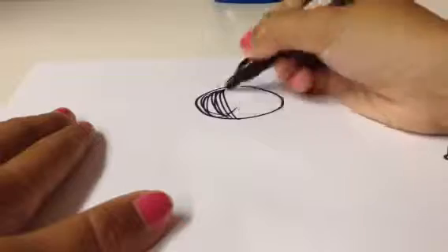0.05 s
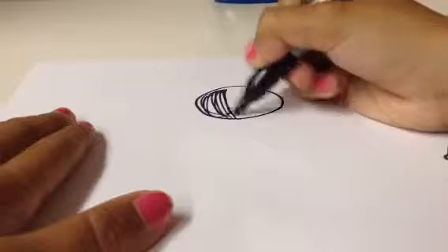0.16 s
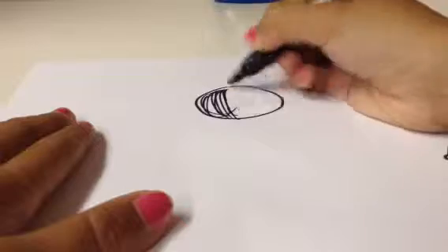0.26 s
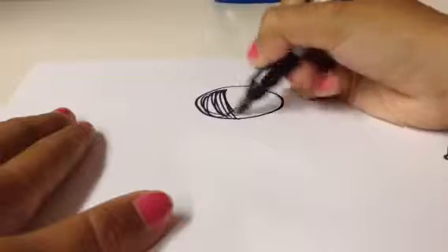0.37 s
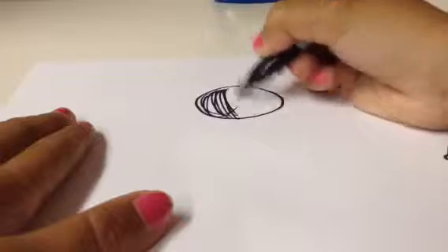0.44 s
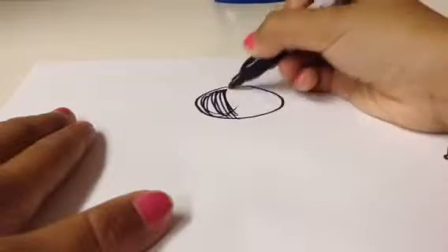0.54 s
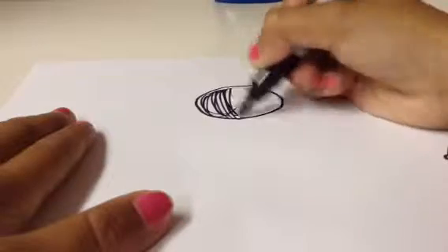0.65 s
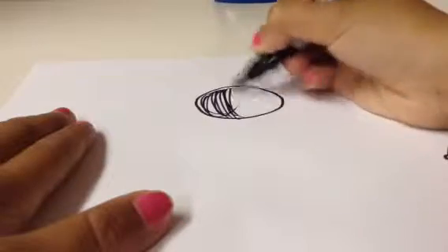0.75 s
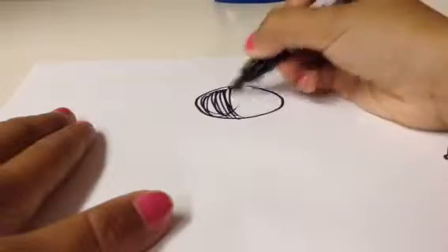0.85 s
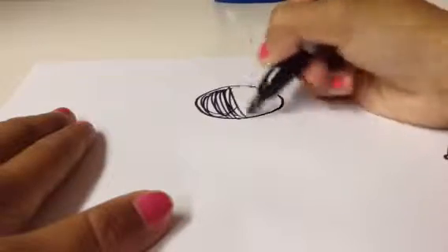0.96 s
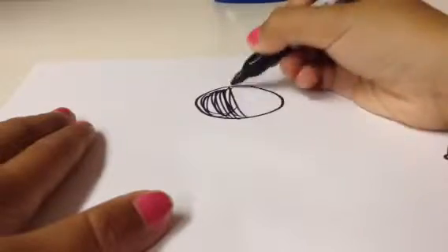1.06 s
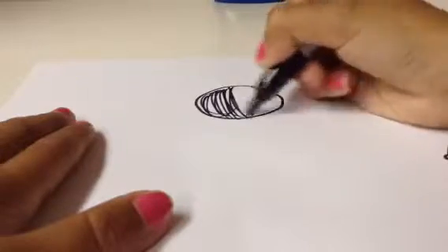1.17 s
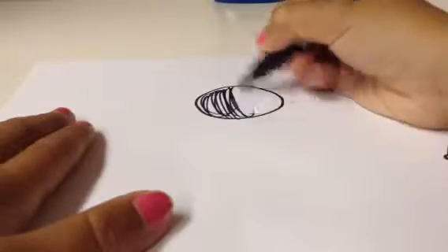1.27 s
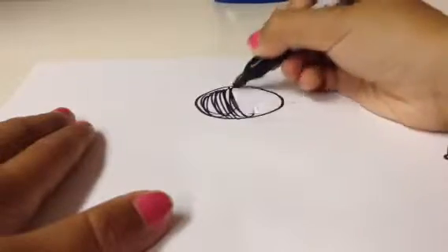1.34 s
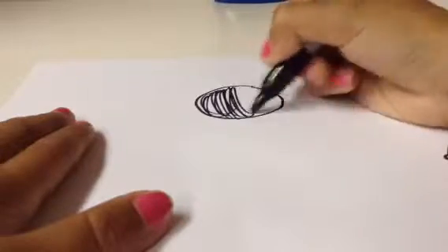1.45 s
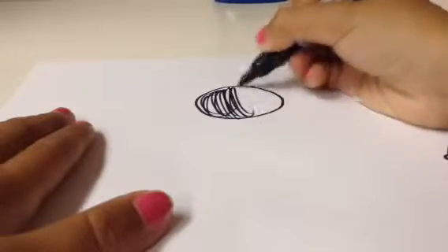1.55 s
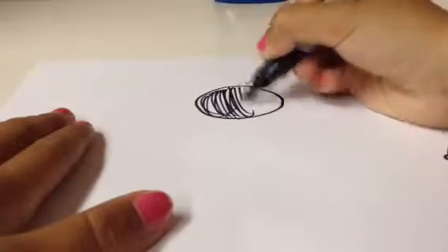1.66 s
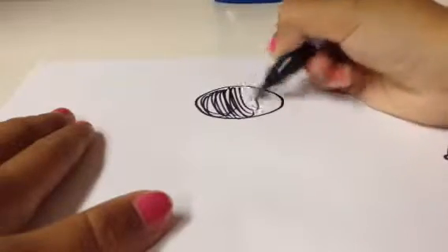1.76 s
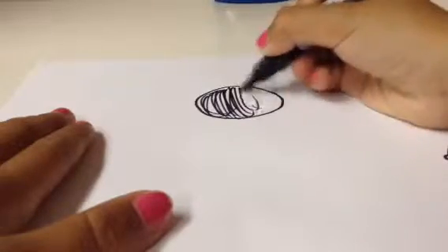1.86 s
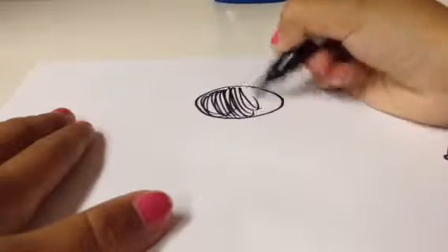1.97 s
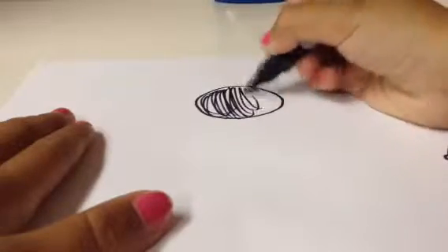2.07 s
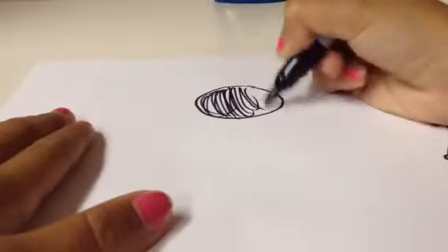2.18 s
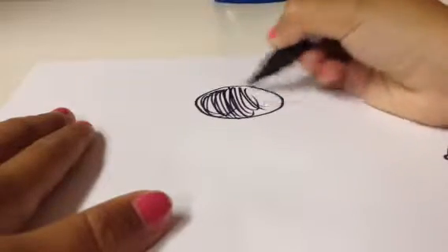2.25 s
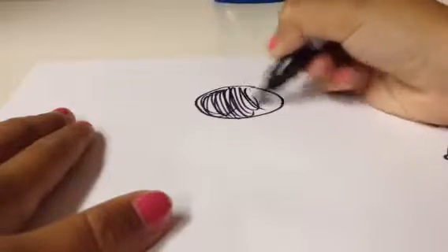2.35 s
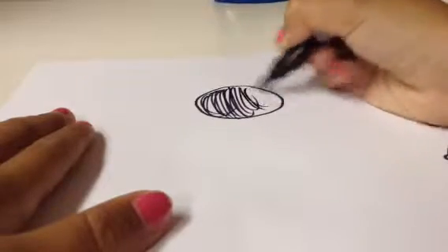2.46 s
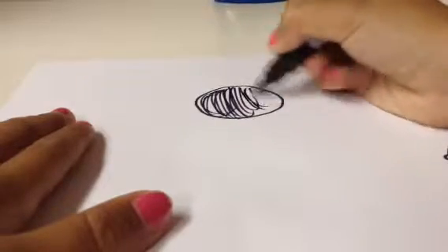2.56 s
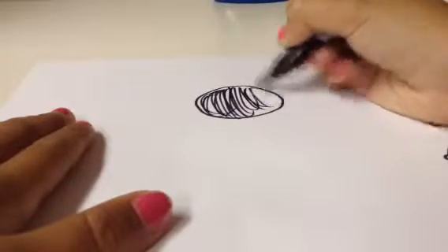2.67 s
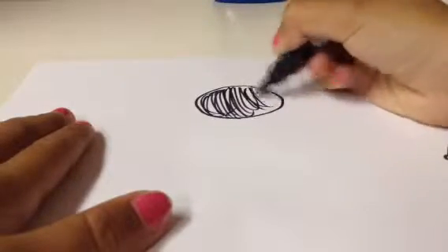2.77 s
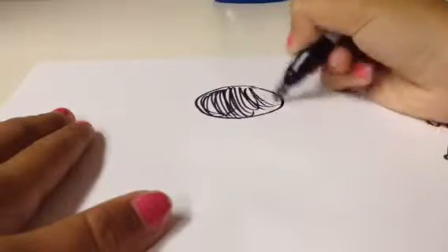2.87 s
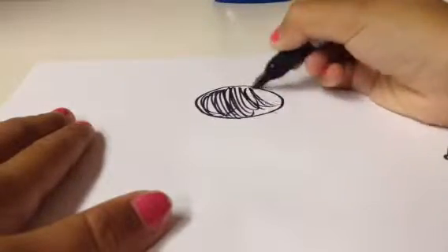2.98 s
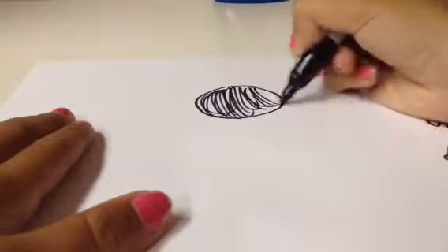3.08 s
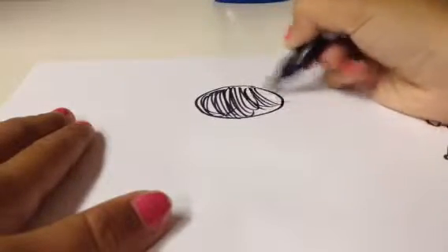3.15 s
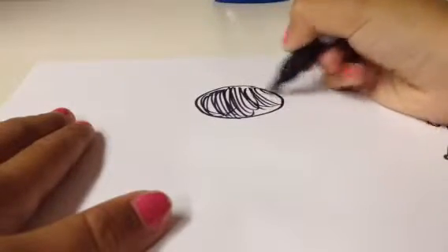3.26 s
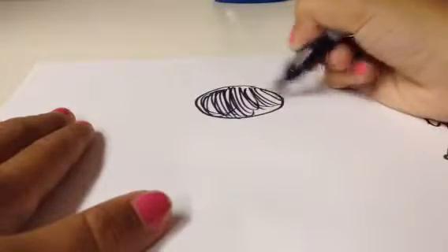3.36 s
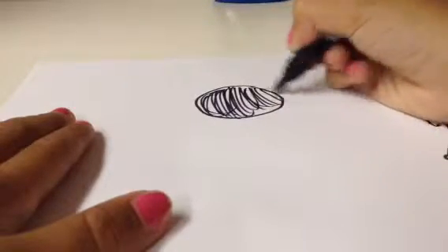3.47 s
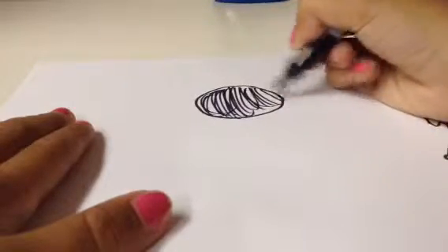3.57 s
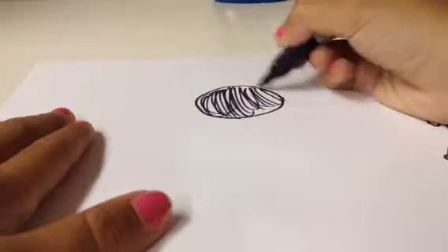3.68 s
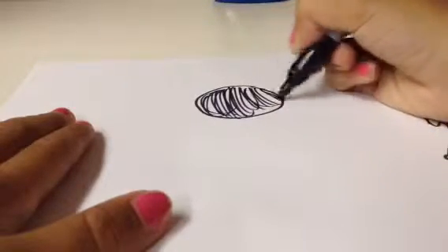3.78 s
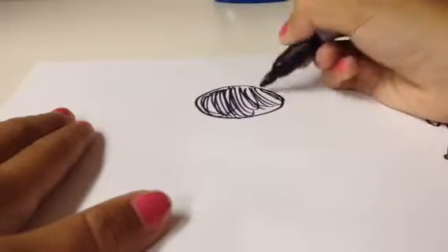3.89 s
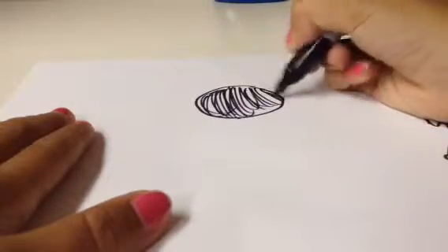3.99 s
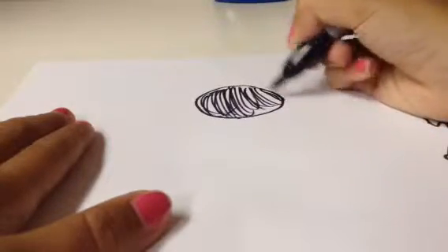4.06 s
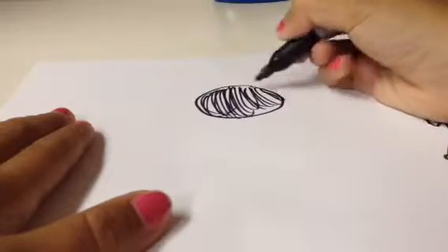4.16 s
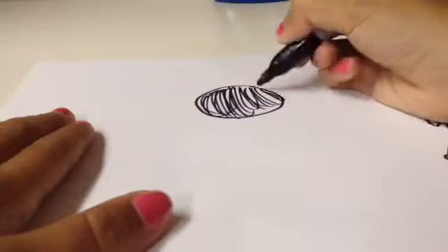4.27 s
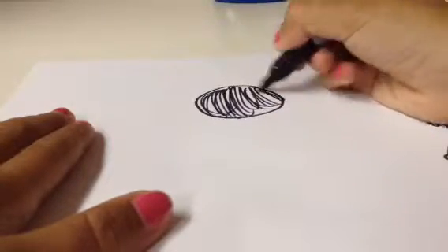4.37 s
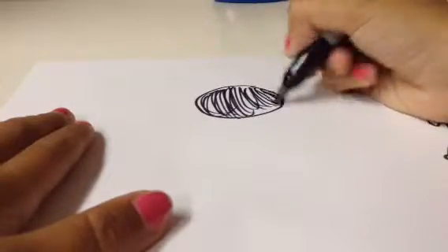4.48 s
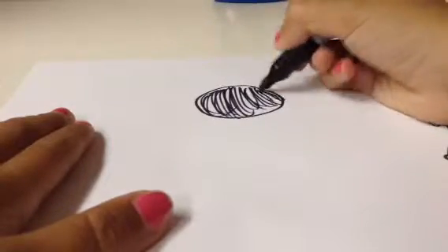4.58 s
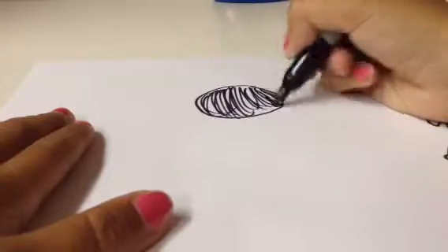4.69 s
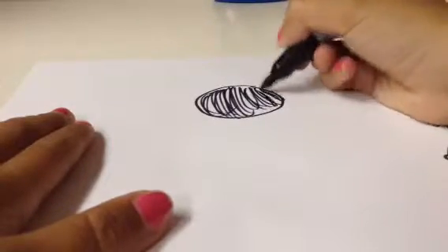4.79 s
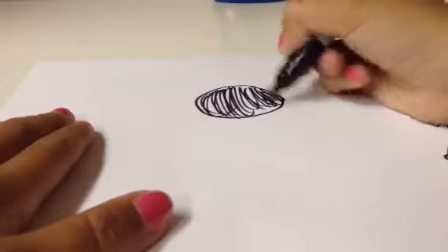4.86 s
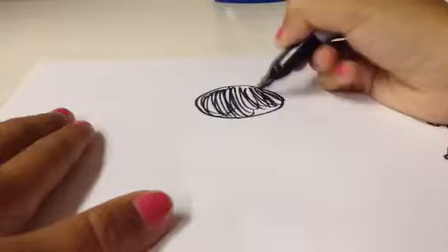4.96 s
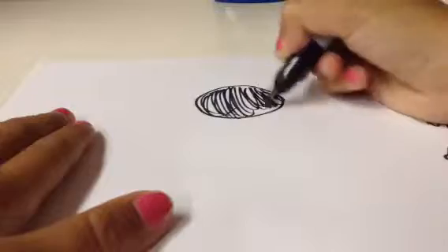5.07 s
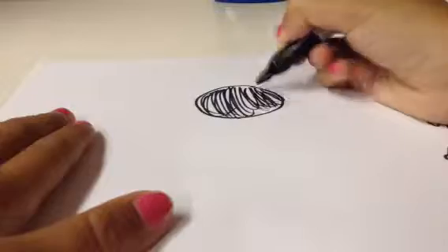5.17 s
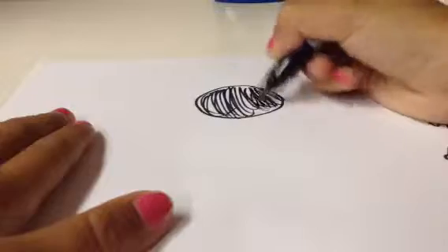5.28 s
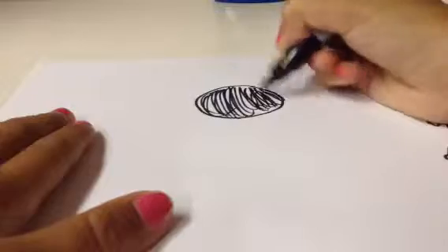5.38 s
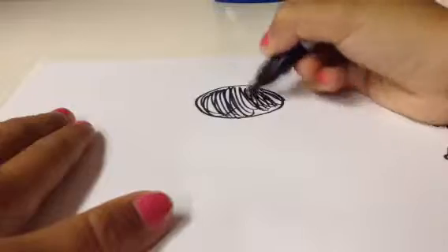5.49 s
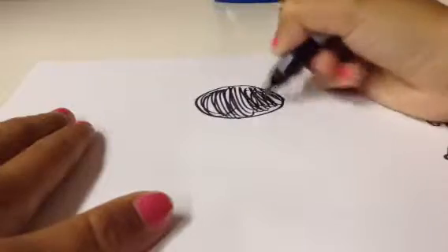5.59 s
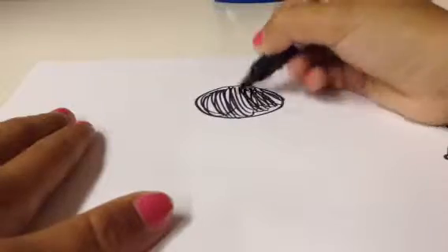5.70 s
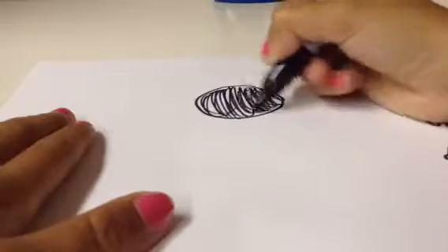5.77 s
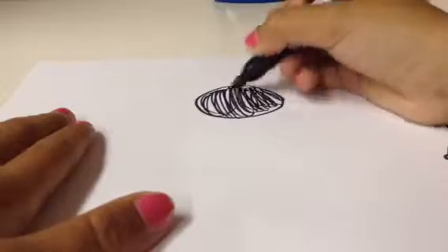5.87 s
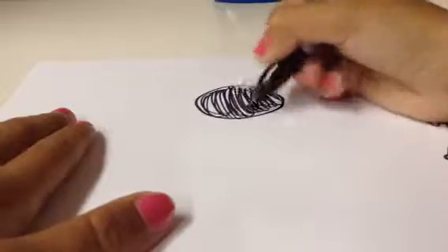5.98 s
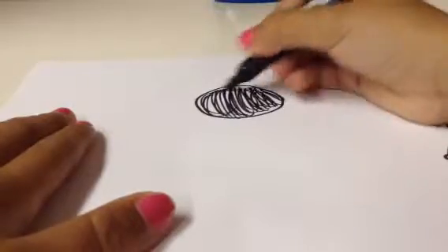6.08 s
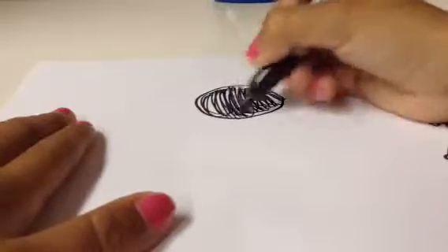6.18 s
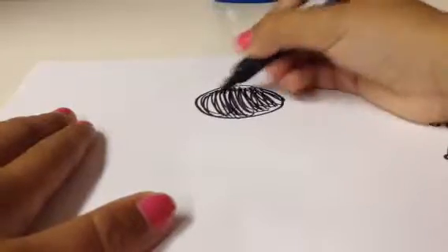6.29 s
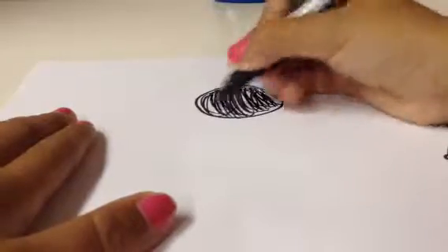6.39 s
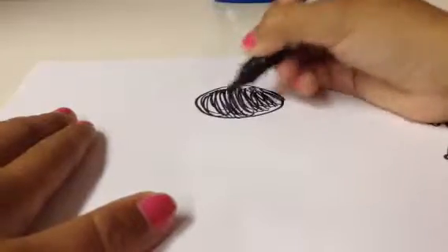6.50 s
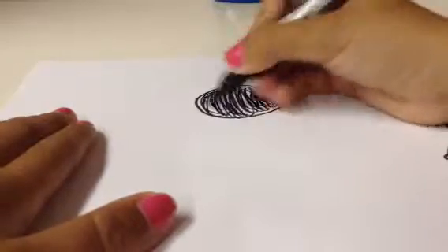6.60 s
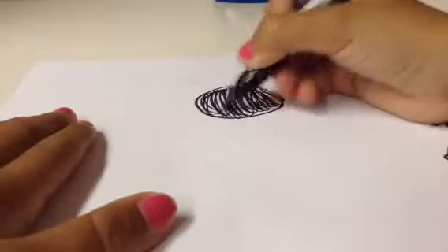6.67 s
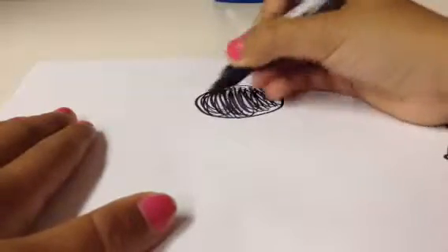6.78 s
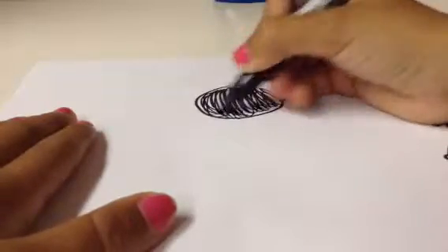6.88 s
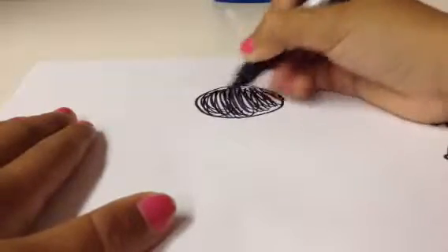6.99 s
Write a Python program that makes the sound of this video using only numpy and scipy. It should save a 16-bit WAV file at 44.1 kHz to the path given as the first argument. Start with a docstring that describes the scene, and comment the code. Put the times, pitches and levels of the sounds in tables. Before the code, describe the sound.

A felt-tip marker shades a shape on paper, heard close and dry in a quiet room. The tail of a stroke opens the sound, then from 0.15 s regular strokes come roughly every quarter second. Each begins with a small dull thump on the desk and plastic barrel, followed by a bright, breathy hiss around a tenth of a second long, with a high whistling edge, slight buzz and low rumble. Tiny clicks appear near 0.5, 0.7, 1.4 and 1.7 s, and the hand brushes the sheet faintly. From about 2.8 s the strokes weaken, becoming very light by 4.0 s. After a short pause they resume at 4.5 s, building to the strongest, scratchiest rubs around 5.8-6.2 s, with faint small extra scuffs between, then continuing firmly to 7 s. Behind lie soft low room noise and hum, plus a barely audible thin, wavering whine from about 3.5 s onward.

```python
"""A desk in a quiet room: a felt-tip marker shades a shape on a sheet of paper, heard close.
Each stroke lands with a tap, struck modes of desk and barrel; then the felt drags and lifts off.
The drag is random slip pulses, shaped into hiss and whistle, buzz of the barrel and rumble of the desk.
Decaying sines make small dry ticks; resonant noise brushes as the hand slides. Behind are a weak echo
tail, shaped noise, two hum tones and a thin whine that enters about halfway and stays, wavering slightly."""
import sys
import numpy as np
from scipy import signal
from scipy.fft import rfft, irfft, next_fast_len
from scipy.io import wavfile
from scipy.ndimage import uniform_filter1d, map_coordinates

SR = 44100
rng = np.random.default_rng(int(sys.argv[2]) if len(sys.argv) > 2 else 0)


def generate_wav(signal):
    """Clip the signal to [-1, 1] and save it as 16-bit WAV at the path in sys.argv[1]."""
    frames = np.transpose(np.atleast_2d(signal))
    scaled = np.clip(frames, -1, 1) * 32767
    pcm = np.round(scaled).astype(np.int16)
    wavfile.write(sys.argv[1], SR, pcm)


N = 310464

# felt pressed down, relative colour: (frequency [Hz], gain [dB])
PRESSED_COLOUR = [(2650, -20), (4500, -13), (4690, -19), (5200, -12.5), (6790, -2), (7380, -12.5),
                  (8180, 2), (8650, 1), (9490, -7), (10000, -13), (10900, -6), (12700, -17.5),
                  (15400, -12.5)]
# felt easing off the sheet, relative colour: (frequency [Hz], gain [dB])
EASING_COLOUR = [(2650, -37), (4500, -13.5), (4940, -17.5), (5730, -13.5), (6190, -10), (6590, -16.5),
                 (8920, -4), (10100, -4.5), (11400, -10), (12700, -12), (15400, -15.5)]
# felt tip and collar modes: (frequency [Hz], width [Hz], gain [dB])
COLLAR_MODES = [(6700, 700, -4), (10200, 500, 0), (12800, 600, -5)]
# marker barrel modes: (frequency [Hz], width [Hz], gain [dB])
BARREL_MODES = [(1180, 31, -6), (1438, 35, -7.5), (1574, 26, -6.5), (2105, 470, -7), (2620, 86, -1),
                (3095, 237, -8), (4890, 530, -14)]
# barrel mode that a firm grip damps: (frequency [Hz], width [Hz], gain [dB])
FREE_BARREL_MODE = (2610, 100, 0)
# desk top modes: (frequency [Hz], width [Hz], gain [dB])
DESK_MODES = [(157.4, 23, 5.5), (254.5, 10.1, 3), (328, 41.3, 2.5), (383.4, 19, 6.5), (468.7, 23, 1.5),
              (533.5, 69, -6.5), (612, 145, -9), (711.7, 66, -5), (937, 82, -16.5)]


def strokes():
    """Slips of the dragging felt hiss and whistle at the tip, buzz in the barrel, rumble in the desk."""
    hiss_gain, buzz_gain, rumble_gain, progress, tip_hz = motion()
    easing = np.clip((progress - 0.35) / 0.24, 0, 1)  # hiss thins as pressure comes off
    lifting = np.clip((progress - 0.85) / 1.1, 0, 1)  # a barely touching tip stops ringing

    pressed = patchy(filtered(slips(spiky_db=0.5, lumpy_db=1), colour(PRESSED_COLOUR)), depth_db=3.5)
    light = patchy(filtered(slips(spiky_db=-3.0, lumpy_db=-0.5), colour(EASING_COLOUR)), depth_db=4.5)
    friction = np.sqrt(1 - easing) * pressed + np.sqrt(easing) * light

    collar = unit(filtered(slips(spiky_db=1.5, lumpy_db=2.5), ringing(COLLAR_MODES)))
    faster = (np.abs(hiss_gain) / amp(-38)) ** 0.69  # faster strokes whistle more
    tip_ring = amp(-1.5) * faster * whistle(tip_hz, width_hz=540) + amp(-10.0) * collar
    hiss = amp(-3.5) * friction + (1 - lifting) * tip_ring

    drag = buzz_gain * slips(spiky_db=-5.5, lumpy_db=1.5)
    barrel = amp(13.5) * filtered(drag, ringing(BARREL_MODES))
    # a loosening grip frees the barrel's strongest mode late in the stroke
    barrel += amp(8.5) * filtered(drag * easing, ringing([FREE_BARREL_MODE]))

    desk_push = rumble_gain * slips(spiky_db=1.0, lumpy_db=5.5)
    # fine slips hardly stir the lowest modes
    desk = amp(22.5) * filtered(desk_push, lambda f: ringing(DESK_MODES)(f) * (f / 400) ** 0.38)
    return hiss_gain * hiss + barrel + desk


SPEEDING_DB, SLOWING_DB = 6.5, 13.5  # depth of the hiss arch before and after top speed
BITE_DB_PER_S, LIFT_DB_PER_S = 2006, 611  # felt takes hold, felt leaves
BUZZ_LIFT_DB_PER_S = 720
BUZZ_FOLLOWS, RUMBLE_FOLLOWS = 0.56, 1  # share of the arch in dB
BUZZ_CHANGE_DB, RUMBLE_CHANGE_DB = -1.5, 1.5  # start to end of a drag: buzz fades slightly, rumble grows
BEND_HZ, RING_HZ = 302, 8700  # whistle rise over a drag; whistle of a tip at rest
LIGHT_MS = 60  # a shorter drag only grazes the sheet
SCUFF_RISE_S, SCUFF_DB_PER_S = 0.0034, 380  # scuff rise time and decay
CREEP_HISS_DB, CREEP_RUMBLE_DB = -8.5, -3.5  # re creep buzz
# felt drags, relative levels: (start [s], time to top speed [ms], slowing time [ms],
#   hiss [dB], barrel buzz [dB], desk rumble [dB], mid-drag whistle [Hz])
DRAG_EVENTS = [(-0.058, 50, 27.7, -48, -57.5, -60, 8860.0), (0.158, 57, 42.6, -37, -49, -56, 8520),
               (0.39, 59, 45.4, -39.5, -52, -56, 8700), (0.673, 41.1, 48.4, -38, -49, -55.4, 8530),
               (0.937, 54, 40.7, -38, -50.8, -54.5, 8530.0), (1.19, 62.6, 52, -38, -49.5, -58.5, 8620.0),
               (1.309, 25, 23.4, -47.5, -57.5, -84, 9130), (1.463, 51, 38.3, -38, -50, -55, 8617),
               (1.705, 47, 58, -40, -49.5, -58, 8640.0), (1.819, 44, 23.7, -42, -51.5, -67.5, 8680),
               (1.943, 44, 42, -40.0, -52.1, -58, 8590.0), (2.163, 58, 38, -41.5, -51, -56.5, 8630),
               (2.396, 43, 50, -41.5, -49.5, -58, 8470), (2.634, 31.5, 53, -41, -51.5, -58.5, 8570),
               (2.856, 54, 44, -42.5, -53, -60, 8720), (3.089, 43, 54, -42.5, -52.5, -59.5, 8710),
               (3.33, 45.5, 41, -45, -54, -63, 8830), (3.56, 65, 24.4, -47, -55, -66.5, 8740.0),
               (3.827, 38, 27, -50.5, -58, -68.5, 8700), (4.039, 47.5, 19, -55, -61, -69, 8790.0),
               (4.487, 66.4, 24.7, -44.5, -54.5, -63, 8900), (4.714, 46.3, 26, -43, -53, -58.9, 8800),
               (4.919, 24.5, 44, -40.5, -54.9, -56, 8840), (5.127, 49.5, 36.7, -42.5, -55, -61.5, 8890),
               (5.34, 45, 44, -37.5, -49.5, -56, 8840), (5.439, 10.3, 11.5, -54, -62, -75, 8860),
               (5.562, 52, 40, -38.5, -52, -58.5, 8830), (5.79, 27.6, 46, -36, -49, -54.5, 8700),
               (5.867, 11, 15.2, -56, -57.5, -67, 8850.0), (6.0, 33.5, 47.5, -34.5, -49, -56.5, 8620),
               (6.212, 57.5, 22, -36, -48.5, -55.5, 8590), (6.302, 15.6, 14, -48, -56.8, -72, 8960),
               (6.441, 39, 54, -38.9, -49, -58.5, 8400.0), (6.672, 40.6, 63, -40, -48.5, -59.5, 8450.0),
               (6.912, 42, 54.6, -40, -50, -58.7, 8180)]


def motion():
    """Tip motion sets hiss, buzz and rumble gains, drag progress (over 1 in the lift), whistle in Hz."""
    t = np.arange(N) / SR
    power, progress, tip_hz = np.zeros((3, N)), np.zeros(N), np.full(N, float(RING_HZ))
    landed_s = np.array([row[0] for row in LANDING_EVENTS])
    starts_s = np.array([row[0] for row in DRAG_EVENTS])

    for s, up_ms, down_ms, hiss_db, buzz_db, rumble_db, hz in DRAG_EVENTS:
        touch_s = max(landed_s[landed_s < s + 0.005], default=0)  # no drag before the tip is down
        near = slice(round(max(touch_s, s - 0.04) * SR), round((s + 0.3) * SR))
        since, up, down = t[near] - s, up_ms / 1000, down_ms / 1000
        arch_db = -SPEEDING_DB * np.clip(1 - since / up, 0, 1) ** 2
        arch_db -= SLOWING_DB * np.clip((since - up) / down, 0, 1) ** 2
        bite_db = BITE_DB_PER_S * np.minimum(since, 0)
        off = np.maximum(since - up - down, 0)
        centred = np.clip(since / (up + down), 0, 1) - 0.5  # -0.5 at the start, 0.5 at the end
        levels_db = np.array([
            hiss_db + arch_db - LIFT_DB_PER_S * off,
            buzz_db + BUZZ_FOLLOWS * arch_db - BUZZ_LIFT_DB_PER_S * off + BUZZ_CHANGE_DB * centred,
            rumble_db + RUMBLE_FOLLOWS * arch_db - LIFT_DB_PER_S * off + RUMBLE_CHANGE_DB * centred])
        power[:, near] += amp(levels_db + bite_db) ** 2
        progress[near] = since / (up + down) + 0.5 * (up_ms + down_ms < LIGHT_MS)
        tip_hz[near] = hz + BEND_HZ * centred

    for s, *_, scuff_db, creep_db in LANDING_EVENTS:
        drag_start_s = starts_s[starts_s > s - 0.005].min()
        near = slice(round(s * SR), round(drag_start_s * SR) + 200)
        since = t[near] - s
        scuff = amp(scuff_db - SCUFF_DB_PER_S * since) * np.clip(since / SCUFF_RISE_S, 0, 1)
        power[0, near] += scuff ** 2
        power[:, near] += amp(creep_db + np.array([[CREEP_HISS_DB], [0], [CREEP_RUMBLE_DB]])) ** 2
        progress[near] = 0

    hiss_gain, buzz_gain, rumble_gain = uniform_filter1d(np.sqrt(power), size=40)
    return hiss_gain, buzz_gain, rumble_gain, progress, tip_hz


def whistle(hz, width_hz):
    """The tip's main resonance, excited by slips; its pitch moves as the tip bends."""
    def slow_noise():
        return filtered(slips(spiky_db=4.0, lumpy_db=0.0), lambda f: 1 / (1 + 1j * f / width_hz) ** 2)

    phase = 2 * np.pi * np.cumsum(hz) / SR
    return unit(slow_noise() * np.cos(phase) + slow_noise() * np.sin(phase))


def slips(spiky_db, lumpy_db):
    """Fibres catch and let go: dense pulses of uneven size, in lumps a few ms long."""
    catches = np.minimum(rng.exponential(size=N), 5)
    size_db = spiky_db * catches + lumpy_db * wobble(350)
    return unit(amp(size_db) * rng.standard_normal(N))


def patchy(x, depth_db):
    """Uneven texture: small patches of time and frequency come out louder or softer; rms 1."""
    z = signal.stft(x, nperseg=256)[2]
    field = uniform_filter1d(rng.standard_normal(z.shape), size=2, axis=0)
    field = uniform_filter1d(field, size=8, axis=1)
    return unit(signal.istft(z * amp(depth_db * unit(field)), nperseg=256)[1][:N])


# tip landings, relative levels: (time [s], blow [dB], barrel knock re blow [dB], contact [ms],
#   felt scuff [dB], buzz of the creep before the drag [dB])
LANDING_EVENTS = [(0.147, -35, 19.5, 0.44, -54, -61), (0.389, -33, 16.5, 1.3, -64, -69),
                  (0.621, -32, 13.5, 1.04, -52, -58.5), (0.902, -36.5, 10, 1.17, -72, -75),
                  (1.174, -38.5, 8, 1.16, -57, -63), (1.424, -34, 12.5, 1.2, -59, -69),
                  (1.674, -34.5, 15, 0.86, -67, -67), (1.916, -36.5, 2, 1.36, -72, -76),
                  (2.157, -37, 15, 1.24, -62, -56), (2.393, -34, 16.5, 1.46, -48, -62),
                  (2.593, -34, 9.5, 1.38, -60, -77), (2.846, -40, 13, 1.6, -60, -71),
                  (3.071, -35.5, 15, 1.12, -58, -59.5), (3.313, -39.5, 10, 1.33, -58, -69),
                  (3.538, -38.5, 8, 1.33, -66, -62.5), (3.806, -37.5, -3, 1.75, -54, -58.5),
                  (4.025, -40.5, -4, 1.76, -72, -67), (4.468, -36, 0, 1.16, -61, -65),
                  (4.687, -35, 13, 0.94, -66, -66), (4.899, -33, 19.5, 0.24, -69, -61),
                  (5.121, -39, 12.5, 1.34, -61, -67), (5.331, -33.5, 9, 0.81, -56, -52.5),
                  (5.535, -31.5, 11, 1.41, -50, -54), (5.731, -37, 3, 1.06, -37, -51),
                  (5.954, -36, 15, 1.39, -41.5, -51), (6.171, -34, -1, 0.82, -44, -52.5),
                  (6.382, -64, 0, 1.35, -44.5, -57), (6.641, -63, 0, 1.5, -49.5, -60.5),
                  (6.877, -33.5, 10, 0.84, -48.5, -56)]


def landings():
    """The soft felt thumps the desk and knocks the barrel."""
    out = np.zeros(N + SR)
    for s, db, knock_db, contact_ms, *_ in LANDING_EVENTS:
        thump = struck(DESK_MODES, contact_ms, gather_ms=1.5, disperse_ms=7.9, spread_db=1)
        knock = struck(BARREL_MODES, contact_ms=0.52, gather_ms=2.01, disperse_ms=0, spread_db=3.5)
        blow = amp(-35) * thump + amp(knock_db - 58) * knock
        out[round(s * SR):][:len(blow)] += amp(db) * blow
    return out[:N]


MIDDLE_HZ = 500  # the pitch that arrives on time in a blow


def struck(modes, contact_ms, gather_ms, disperse_ms, spread_db):
    """A half-sine push sets off modes of random strength; bending waves bring low pitch later."""
    t = np.arange(SR // 5) / SR
    ring = np.zeros(len(t))
    for hz, width_hz, db in modes:
        lag_cycles = (gather_ms - disperse_ms) * hz + 2 * disperse_ms * np.sqrt(MIDDLE_HZ * hz)
        lag_cycles /= 1000
        swell_ms = gather_ms + 1.5 * disperse_ms * max(MIDDLE_HZ / hz - 1, 0)
        swell = np.sin(np.pi / 2 * np.clip(t * 1000 / swell_ms, 0, 1)) ** 2
        strength = width_hz * amp(db + rng.normal(0, spread_db))
        decay = np.exp(-np.pi * width_hz * t)
        ring += strength * swell * decay * np.cos(2 * np.pi * (hz * t - lag_cycles))
    push = np.sin(np.pi * np.clip(t[:200] * 1000 / max(contact_ms, 0.2), 0, 1))
    return np.convolve(ring, push / push.sum())[:len(t)]


# small dry ticks of sheet or marker: (time [s], level [dB], pitch [Hz], main decay to -60 dB [cycles])
TICK_EVENTS = [(0.5311, -22.5, 8080, 50), (0.668, -25, 914, 5.7), (.67, -31, 3700, 7.2),
               (1.366, -35, 4050, 5.3), (1.3883, -26, 7120, 5.9), (1.398, -29, 4000, 5.7),
               (1.398, -36, 2080, 5), (1.711, -28, 4080, 24.5), (2.545, -47, 648, 10.5),
               (3.02, -44, 644, 9.3), (4.454, -39, 650, 9.1)]


def ticks():
    """Each tick is a sharp start and a rough ring: a phase-jittered sine with a fast and a slow decay."""
    out, t = np.zeros(N + SR), np.arange(SR // 20) / SR
    for s, db, hz, cycles in TICK_EVENTS:
        phase = 2 * np.pi * hz * t + 0.12 * rng.standard_normal(len(t)).cumsum()
        fade = amp(-60 * t * hz / cycles) + 0.077 * amp(-60 * t * hz / (8 * cycles))
        attack = (1 - np.exp(-t * hz / 1.7)) ** 2
        out[round(s * SR):][:len(t)] += amp(db) * fade * attack * np.sin(phase)
    return out[:N]


# hand slides on the sheet: (start [s], length [ms], level [dB])
SLIDE_EVENTS = [(.04, 79, -72), (.29, 300, -59.5), (.535, 97, -63.5), (.81, 90, -72), (1.06, 90, -72),
                (2.29, 76, -79), (2.529, 48, -67), (5.03, 120, -64.5)]
# sheet and desk under brushing skin: (frequency [Hz], width [Hz], gain [dB])
SKIN_MODES = [(380, 84, 7), (820, 210, 0), (2570, 1200, -7), (4040, 1400, -6), (8200, 1200, 1.5),
              (9000, 7000, -25)]


def hand():
    """Skin slips faintly over the sheet and excites its modes; each slide swells and fades."""
    t = np.arange(N) / SR
    level = np.zeros(N)
    for s, ms, db in SLIDE_EVENTS:
        level += amp(db) * np.sin(np.pi * np.clip((t - s) * 1000 / ms, 0, 1)) ** 0.74
    return level * unit(filtered(slips(spiky_db=-2.5, lumpy_db=3.0), ringing(SKIN_MODES)))


def echoes(x):
    """The room answers with a noise tail, down 60 dB in 0.2 s."""
    t = np.arange(SR // 4) / SR
    tail = rng.standard_normal(len(t)) * amp(-60 * t / 0.2)
    return signal.fftconvolve(x, tail / np.linalg.norm(tail))[:N]


ROOM_DB = -66.5  # mean level
# background noise, relative colour: (frequency [Hz], gain [dB])
ROOM_COLOUR = [(15, -61), (25, -12), (59, -68), (98, -3.5), (266, 0.5), (330, 0.5), (494, -9.5), (565, -8),
               (780, -11.5), (1370, -15.5), (2830, -14.5), (3330, -15.5), (6340, -13.5), (15400, -18)]


def room():
    """Steady coloured noise under slightly unsteady tones."""
    noise = patchy(filtered(rng.standard_normal(N), colour(ROOM_COLOUR)), depth_db=1.5)
    return amp(ROOM_DB + 0.28 * wobble(2.89)) * noise + hum() + whine()


# low room tones: (frequency [Hz], relative level [dB])
HUM_TONES = [(119, -77), (241, -86.5)]


def hum():
    """Low sines with small random drifts of level and phase."""
    t = np.arange(N) / SR
    out = np.zeros(N)
    for hz, db in HUM_TONES:
        out += amp(db + 2 + 2 * wobble(9)) * np.sin(2 * np.pi * hz * t + 0.9 * wobble(10))
    return out


# thin whine: (time [s], relative level [dB], frequency [Hz])
WHINE_TRACK = [(3.4, -105, 3355), (3.6, -84, 3362), (3.95, -84, 3388), (5.3, -82, 3386), (5.9, -87, 3386),
               (6.5, -82, 3384), (7.04, -86, 3375)]


def whine():
    """A thin sine follows a track of level and pitch, wavering slightly; near silent outside it."""
    t = np.arange(N) / SR
    s, level_db, pitch_hz = np.transpose(WHINE_TRACK)
    db = np.interp(t, s, level_db, left=-120, right=-120)
    hz = np.interp(t, s, pitch_hz, left=0, right=0)
    phase = 2 * np.pi * np.cumsum(hz) / SR + 0.5 * wobble(10)
    return amp(db + 4 + 1.5 * wobble(10)) * np.sin(phase)


def amp(db):
    """dB to gain."""
    return 10 ** (np.asarray(db) / 20)


def unit(x):
    """x at rms 1."""
    return x / np.sqrt(np.mean(x ** 2) + 1e-20)


def wobble(rate_hz):
    """Smooth random curve, rate_hz knots a second."""
    knots = rng.standard_normal(int(N * rate_hz / SR) + 4)
    return map_coordinates(knots, [np.arange(N) * rate_hz / SR])


def filtered(x, response):
    """x through a complex response of frequency."""
    m = next_fast_len(N + SR // 2)
    return irfft(rfft(x, m) * response(np.fft.rfftfreq(m, 1 / SR)), m)[:N]


def colour(points):
    """Gain curve through (Hz, dB) points on a log frequency axis."""
    f, db = np.transpose(points)
    return lambda hz: amp(np.interp(np.log(hz + 1), np.log(f + 1), db))


def ringing(modes):
    """Causal response of resonances of alternating sign."""
    def response(f):
        total = 0
        for k, (centre, width, db) in enumerate(modes):
            resonance = 1j * f * width / (centre * centre - f * f + 1j * f * width)
            total = total + (-1) ** k * amp(db) * resonance
        return total
    return response


def scene():
    """Marker and hand close by, the room around them."""
    near = strokes() + landings() + ticks() + hand()
    # deep bass is rolled off below about 105 Hz
    near = filtered(near, lambda f: (1j * f / 105 / (1 + 1j * f / 105)) ** 2)
    wet = amp(-20) * echoes(near)
    return (near + wet + room())[None]


TOP_HZ = 15300


def record(dry):
    """Band limit: nothing passes at or above TOP_HZ."""
    return filtered(dry[0], lambda hz: hz < TOP_HZ)[None]


dry = scene()
out = record(dry)
generate_wav(out)
```